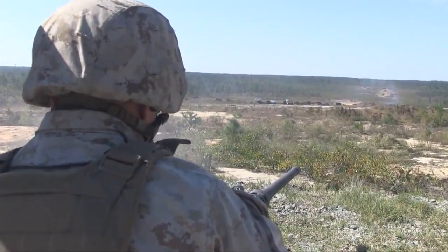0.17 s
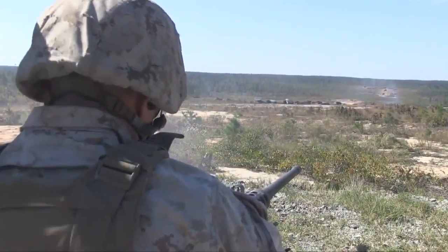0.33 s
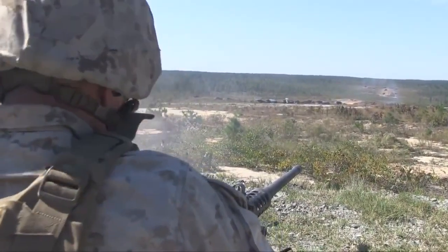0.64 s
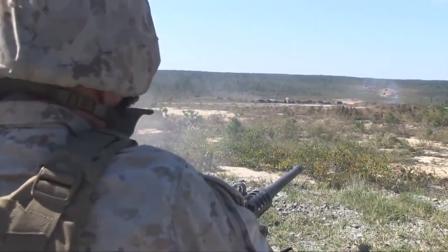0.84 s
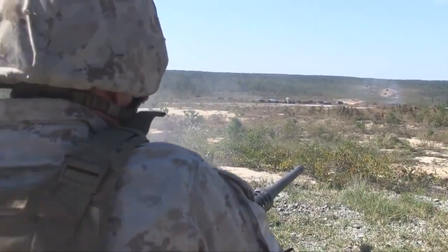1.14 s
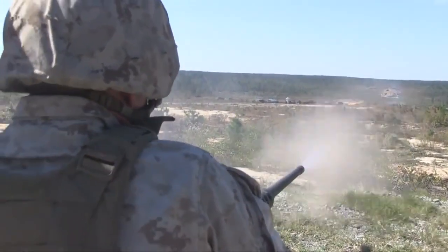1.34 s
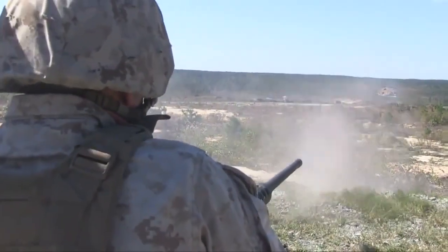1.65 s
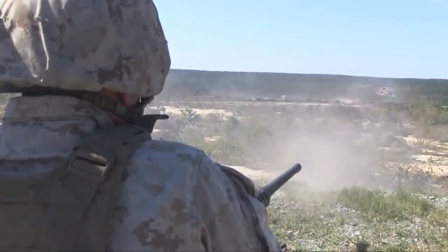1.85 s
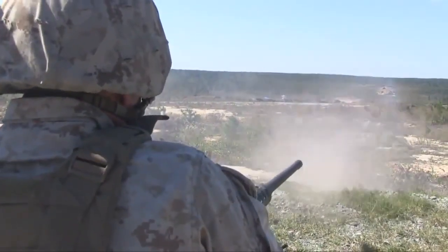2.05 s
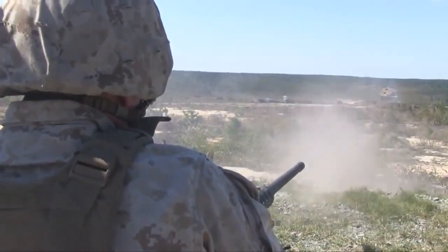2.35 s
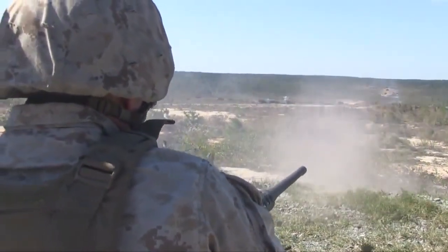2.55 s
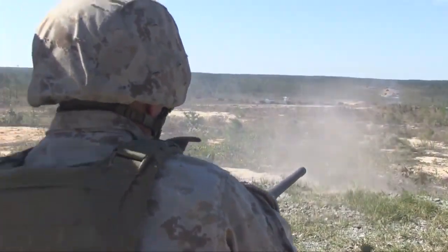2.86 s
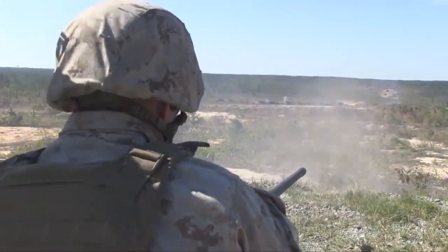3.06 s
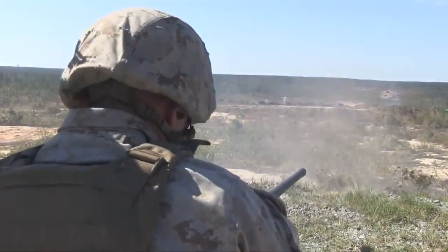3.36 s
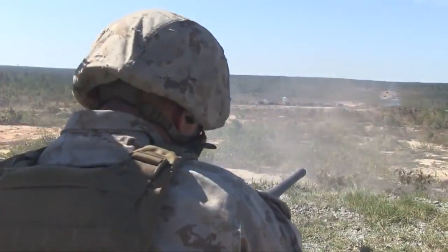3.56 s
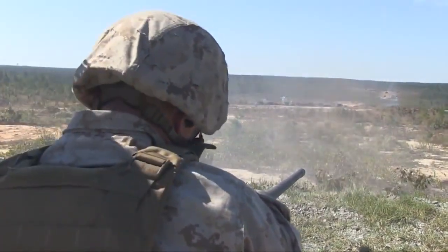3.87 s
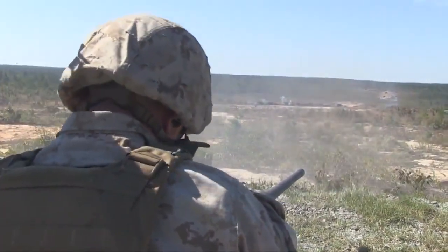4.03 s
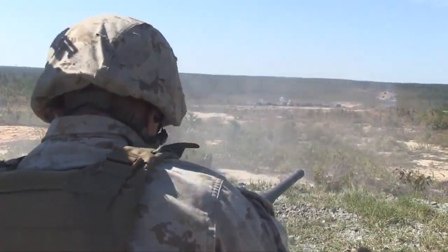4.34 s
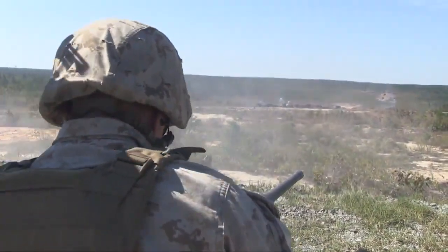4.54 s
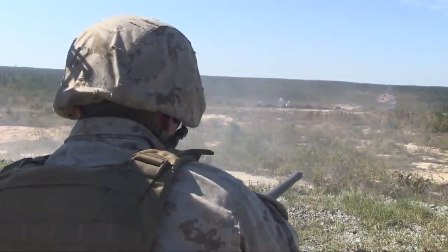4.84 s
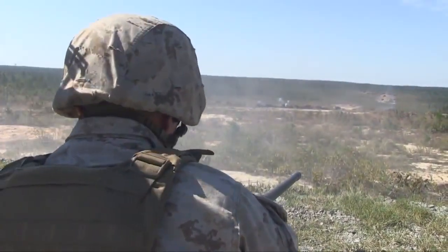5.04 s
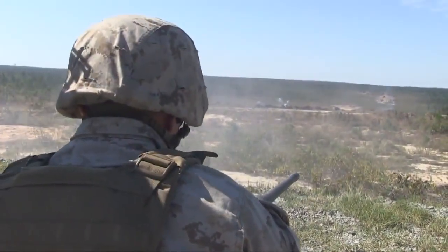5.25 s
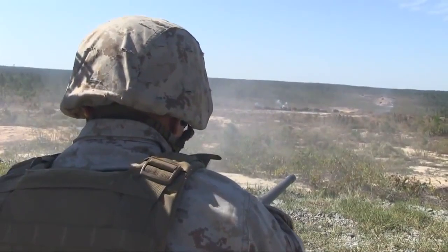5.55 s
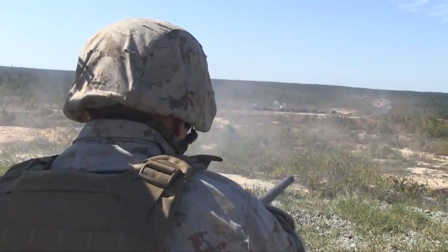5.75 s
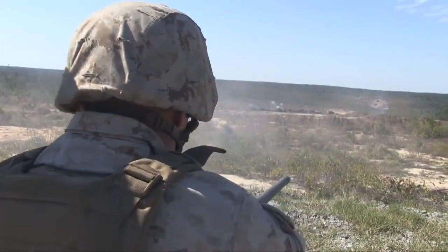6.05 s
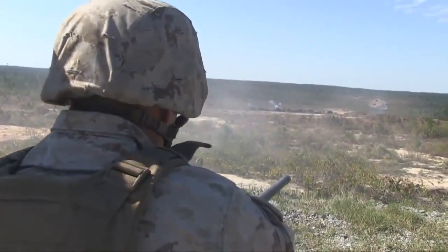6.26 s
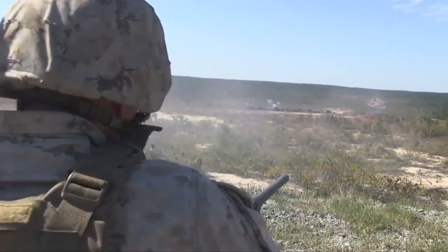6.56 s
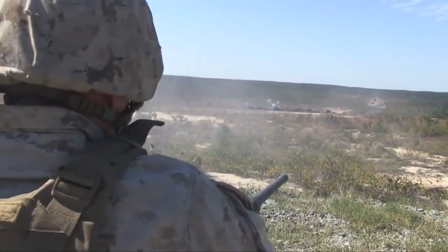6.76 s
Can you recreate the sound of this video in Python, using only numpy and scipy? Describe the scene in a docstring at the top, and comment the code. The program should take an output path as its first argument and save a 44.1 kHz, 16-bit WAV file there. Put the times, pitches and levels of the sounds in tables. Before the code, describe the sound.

Six machine guns fire in turn across a valley, recorded outdoors in stereo right beside one of them. The near gun blasts with gassy, flattened harshness while a sharper one chatters over it; spent cases tinkle faintly. Distant rapid and slower guns overlap, a neighbour thumps heavily, then after roaring echoes and small cracks another quick burst ends it.

```python
"""An open range in a valley: six machine guns fire bursts, one close by, a neighbour, four further down the line.
Every shot of a gun repeats one blast front, ground bounce and set of echoes, under fresh noise of turbulent gas.
Spent cases ring faintly; faint cracks and pops sound, most between bursts, one a bolt clack just before a
burst's last shot; shaped noise is the valley's roar.
The blasts overload the microphone and flatten; a bass cut then tilts the flat tops."""
import sys
import numpy as np
from scipy.fft import rfft, irfft, next_fast_len
from scipy.io import wavfile
from scipy.ndimage import uniform_filter1d, map_coordinates

SR = 44100
rng = np.random.default_rng(int(sys.argv[2]) if len(sys.argv) > 2 else 0)


def unload_wav(signal):
    """Save mono or channel-first audio to the path in sys.argv[1] as 16-bit WAV at rate SR, clipped to [-1, 1]."""
    wavfile.write(
        sys.argv[1],
        SR,
        np.round(np.clip(np.atleast_2d(signal).T, -1, 1) * 32767).astype(np.int16),
    )


N = 304290  # samples in the scene
SHOT = SR // 5  # samples that a shot lasts
BESIDE, NEIGHBOUR, FAR, SLOW, QUICK, BRIGHT = 0, 1, 2, 3, 4, 5  # guns, the row order of every table by gun

# Firing times: start_s, gun, level_db
SHOTS = [(0.0431, FAR, -3), (1.326, BESIDE, -3), (1.4497, BESIDE, 1.5), (1.5912, BESIDE, 1),
         (1.7137, BESIDE, 2.5), (1.7551, BRIGHT, -1.5), (1.8366, BESIDE, 0.5), (1.841, BRIGHT, 4),
         (1.9311, BRIGHT, 3.5), (1.9841, BESIDE, 2), (2.0215, BRIGHT, 2), (2.104, BESIDE, -0.5),
         (2.1099, BRIGHT, 9.5), (2.1991, BRIGHT, 6), (2.2426, BESIDE, 0.5), (2.2862, BRIGHT, 5),
         (2.3715, BESIDE, -0.5), (2.377, BRIGHT, 5), (2.4623, BRIGHT, 8), (2.5006, BESIDE, 0),
         (2.5524, BRIGHT, 1), (2.6376, BRIGHT, 5), (2.8157, FAR, -15), (3.0129, FAR, -0.5),
         (3.1085, FAR, 1), (3.2046, FAR, 0), (3.2238, SLOW, 0), (3.2984, FAR, 0), (3.3708, SLOW, 0),
         (3.3925, FAR, 0), (3.4882, FAR, 0), (3.5474, SLOW, 0), (3.5806, FAR, 0), (3.676, FAR, 0),
         (3.7677, FAR, 0), (3.8609, FAR, 0), (4.0132, NEIGHBOUR, -1.5), (4.1269, NEIGHBOUR, 0),
         (4.2408, NEIGHBOUR, -0.5), (4.3537, NEIGHBOUR, -1.5), (4.4833, NEIGHBOUR, -0.5),
         (4.5961, NEIGHBOUR, -1), (4.7207, NEIGHBOUR, 0), (6.3772, QUICK, 0.5), (6.4648, QUICK, 0),
         (6.552, QUICK, -0.5), (6.638, QUICK, 0.5), (6.7259, QUICK, 1), (6.814, QUICK, 1)]
OPENING_S, OPENING_DB = 1.3279, 20  # the gun beside opens its burst with a stronger front


def guns():
    """Superposition: each shot adds fresh turbulence to the blast that its gun repeats."""
    out = np.zeros((2, N + SHOT))
    blasts = [blast(gun) for gun in range(len(FRONTS))]
    for start_s, gun, level_db in SHOTS:
        direct, reflected = blasts[gun]
        body, hiss = gas(gun)
        first = round(start_s * SR)
        out[:, first:first + SHOT] += amp(level_db) * (direct + reflected + 0.54 * body + hiss)
    first = round(OPENING_S * SR)
    opening_front, _ = blasts[BESIDE]
    out[:, first:first + SHOT] += amp(OPENING_DB) * opening_front
    return out[:, :N]


# Blast front by gun: rise_ms, swing_ms, decay_ms, bounce_delay_ms, bounce_swing_ms, left_lead_ms
FRONTS = [(.2, .55, 3, 1.6, .55, -.03), (.15, .6, 5, 2.4, .6, .07), (.6, 1.05, 2.8, 2.5, 1.55, .11),
          (1, 1.35, 4.2, 3.6, 1.75, .11), (.45, 1.05, 2.6, 2.55, 1.4, .11), (.2, .9, 3, 2.2, 1.4, .02)]
# Strength by gun: front_db, bounce_db, echoes_db, push_db
STRENGTHS = [(-15.5, -21.5, 5.5, -3.5), (8.5, -9, 1, -13), (12, 8, 2, -28), (11.5, 8.5, .5, -28),
             (12, 11.5, 4.5, -19), (6, 8, -0.5, -28)]
# Loudest echoes off mounds and banks, one list a gun: delay_ms (before 1.2 ms more), level_db (before echoes_db)
ECHOES = [
    [(25.0, -8.5), (32.8, 8), (35.5, -2), (40.1, -9), (57.5, -4.5), (75.6, -10), (82.0, -10)],
    [(8.7, 7.5), (13.7, -2), (18.7, 0.5), (22.6, -2.5), (26.7, -6), (49.6, -4), (61.9, -7), (66.4, -8),
     (71.5, -12), (84.6, -10)],
    [(7.8, -7), (12.0, -10), (16.2, -14), (19.0, -16), (36.2, -14.5), (41.1, -17.5), (79.3, -17.5)],
    [(9.8, -5.5), (17.3, -16), (20.2, -16)],
    [(11.7, -11.5), (18.8, -15.5), (22.9, -17), (29.5, -15), (33.3, -13.5), (36.2, -16.5), (61.6, -21),
     (66.9, -21), (72.1, -14)],
    [(9, -6), (13, -16.5), (30, -9), (35, -12), (73, -12)],
]
# Echo width by gun: width_ms
ECHO_WIDTHS = [0.65, 0.8, 0.64, .66, 0.59, 0.58]


def blast(gun):
    """Shock and reflection: a steep front and slower ground bounce; then echoes, a low push and scatter."""
    rise_ms, swing_ms, decay_ms, bounce_ms, bounce_swing_ms, lead_ms = FRONTS[gun]
    front_db, bounce_db, echoes_db, push_db = STRENGTHS[gun]
    ms = np.arange(SHOT) / SR * 1000 + np.array([[lead_ms], [0]])

    def front(t_ms, quarter_ms):
        """Damped oscillation: a smooth rise, then a cosine that decays."""
        late = np.maximum(t_ms, 0)
        rise = np.sin(np.pi / 2 * np.clip(t_ms / rise_ms, 0, 1)) ** 2
        return -rise * np.cos(np.pi / 2 * late / quarter_ms) * np.exp(-late / decay_ms)

    bounce = amp(bounce_db) * front(ms - bounce_ms, bounce_swing_ms)
    direct = amp(front_db) * front(ms, swing_ms) + bounce
    echoes = sum(amp(level_db + echoes_db) * bump(ms - delay_ms - 1.2, ECHO_WIDTHS[gun])
                 for delay_ms, level_db in ECHOES[gun])
    push = amp(push_db) * bump(ms - 24, 1.8)  # the ground shakes
    scatter, _ = gas(gun)  # drawn once: fixed obstacles scatter alike each time
    return direct, echoes + strewn(ms, gun) + push + .7 * scatter


# Weaker echoes by gun: level_db (where they start)
STREWN_LEVELS = [-12, -6.5, -22, -33, -25, -18]
STREWN_MS, STREWN_FADE_DB, STREWN_SPREAD_DB = (20, 110), 7.5, 4  # span, fade across it, random spread
STREWN_WIDTH_MS, STREWN_PAN_DB = 0.5, 2.5  # sharper than the loudest echoes, from either side


def strewn(ms, gun, count=18):
    """Diffuse reflection: weak echoes at random delays, the same for every shot of a gun."""
    place = (np.arange(count) + rng.random(count)) / count
    size, pan, width = rng.standard_normal((3, count))
    first_ms, last_ms = STREWN_MS
    delays_ms = first_ms + (last_ms - first_ms) * place
    levels_db = STREWN_LEVELS[gun] - STREWN_FADE_DB * place + STREWN_SPREAD_DB * size
    widths_ms = STREWN_WIDTH_MS * np.exp(0.18 * width)
    out = np.zeros((2, SHOT))
    for delay_ms, level_db, side, width_ms in zip(delays_ms, levels_db, pan, widths_ms):
        sides_db = STREWN_PAN_DB * side * np.array([[.5], [-.5]])
        out += amp(level_db + sides_db) * bump(ms - delay_ms, width_ms)
    return out


def bump(ms, width_ms):
    """Dispersal: a blast rounded off by distance, one hump between two dips."""
    return (1 - (ms / width_ms) ** 2) * np.exp(-.5 * (ms / width_ms) ** 2)


# Gas spectra, relative: pitch_hz, density_db (per Hz); the hiss for the gun beside, one pit away, further off
BODY_SPECTRUM = [(100, -12.5), (200, 5.5), (400, 0), (900, 1), (1500, -8), (3000, -17.5), (5000, -34.5)]
HISS_SPECTRA = [
    [(700, -30), (1500, -3), (3000, 0), (6000, -3), (10000, -5), (14000, -11), (17000, -22)],
    [(700, -25), (1500, -1), (3000, 0), (6000, -5), (10000, -10), (14000, -20), (17000, -32)],
    [(700, -25), (1500, -3), (3000, 0), (6000, -5), (10000, -15), (14000, -27), (17000, -40)],
]
# Gas envelopes by gun: start_ms, peak_db, lasts_ms, droop_db, fall_db_per_ms, puff_ms, puff_db, tail_db,
# loss_db (per 100 ms)
BODY_GUSTS = [(5, 7.5, 19.2, 4.9, 1.08, 44, -15, -8.5, 12.9),
              (0, 13.5, 10, 5.3, 2.1, 34, -5.5, -10.5, 13.7), (0.5, -14.5, 6.6, 3, 1.3, 40, -40, -28, 11.3),
              (-1, -15.5, 8.3, 3.4, 0.65, 40, -40, -40, 11), (5, -5, 2.2, 3.4, 3.9, 35, -29, -19, 24),
              (0, -3.5, 4.2, 3.8, 1.4, 36, -32, -21, 16.4)]
HISS_GUSTS = [(5, 14.5, 12.3, 9.4, 4.2, 31.7, -11, -19.5, 12.5),
              (0.5, 2.8, 9.4, 10.6, 2.5, 37, -22, -20, 9.5),
              (-10.5, -19.5, 8.9, 4.4, 1.6, 40, -55, -38.5, 6), (2, -30, 8.8, 4, 0.92, 40, -55, -52, 10),
              (3.5, -13, 2.64, 4, 6, 38, -43, -33, 15), (-1.5, -5.5, 6, 15, 2.6, 50, -37.5, -37, 6.4)]


def gas(gun):
    """Turbulence: body and hiss of the gas behind one blast, as shaped noise."""
    ms, lead_ms = np.arange(SHOT) / SR * 1000, FRONTS[gun][-1]
    body = sideways(noise(BODY_SPECTRUM, count=SHOT), lead_ms)
    hiss = sideways(noise(HISS_SPECTRA[min(gun, FAR)], count=SHOT), lead_ms)  # distance dulls it
    return gust(ms, *BODY_GUSTS[gun]) * body, gust(ms, *HISS_GUSTS[gun]) * hiss


PUFF_RISE_DB_MS, PUFF_FALL_DB_MS = 0.5, 1.5


def gust(ms, start_ms, peak_db, lasts_ms, droop_db, fall_db, puff_ms, puff_db, tail_db, loss_db):
    """Addition of power: flash, puff and tail make one envelope."""
    since = ms - start_ms
    droop = droop_db * np.clip(since / lasts_ms, 0, 1)
    fall = fall_db * np.maximum(since - lasts_ms, 0)
    flash = np.clip(since / 0.41, 0, 1) * amp(peak_db - droop - fall)
    away_db = np.maximum(PUFF_RISE_DB_MS * (puff_ms - ms), PUFF_FALL_DB_MS * (ms - puff_ms))
    puff = amp(puff_db - away_db)
    tail = np.minimum(ms / .6, 1) * amp(tail_db - loss_db * ms / 100)
    return np.sqrt(flash ** 2 + puff ** 2 + tail ** 2)


# Spent cases landing: start_s, level_db
CASES = [(1.42, -32.5), (1.57, -32), (1.90, -33), (2.03, -32), (2.29, -36), (2.44, -36), (2.655, -41),
         (2.70, -36)]
# Brass modes: pitch_hz, level_db, t60_s
BRASS_MODES = [(6200, -0.5, 0.32), (3400, -3.5, 0.23)]


def cases():
    """Modal resonance: each spent case rings faintly and thinly in decaying sines."""
    out, t = np.zeros(N), np.arange(SR // 4) / SR
    for start_s, case_db in CASES:
        ring = np.zeros(len(t))
        for hz, mode_db, t60_s in BRASS_MODES:
            decay = amp(case_db + mode_db + rng.normal(0, 2) - 60 * t / t60_s)
            ring += decay * np.sin(2 * np.pi * hz * rng.normal(1, 0.0016) * t)
        out[round(start_s * SR):][:len(t)] += np.minimum(t / .003, 1) * ring
    return out


# Faint cracks and pops, most between bursts, one a bolt clack just before a burst's last shot:
# start_s, crack_db (before a 10 dB cut), pop_db (before a 5.5 dB lift)
CRACKS = [(0.4544, -14.5, -19.5), (0.704, -14, -28), (0.8583, -21, -18), (1.043, -24, -25),
          (1.138, -22.5, -26), (1.2167, -10.5, -9.5), (1.3, -18, -31), (2.631, -7, -11),
          (2.7708, -13.5, -36), (2.8949, -12, -37), (4.9018, -17.5, -17), (5.025, -11.5, -13),
          (5.1237, -31.5, -23), (5.316, -25, -30), (5.4394, -38, -34)]
# Spectrum of the spit, relative: pitch_hz, density_db (per Hz)
SPIT_SPECTRUM = [(900, -25), (2000, -2), (3200, 0), (6000, -12), (9000, -26), (12000, -50)]


def cracks():
    """Impulsive noise: a short dull spit decaying over one low pop."""
    out, ms = np.zeros((2, N)), np.arange(SR // 20) / SR * 1000
    onset = np.minimum(ms, 1)
    for start_s, crack_db, pop_db in CRACKS:
        spit = amp(crack_db - 10 - 60 * ms / 45) * onset * noise(SPIT_SPECTRUM, count=len(ms))
        pop = amp(pop_db + 5.5) * onset * bump(ms - 1.3, 0.75)
        out[:, round(start_s * SR):][:, :len(ms)] += spit + pop
    return out


# Roar of the valley: time_s, rumble_db, rush_db
ROAR = [(0, -23, -31.5), (.57, -22, -24.5), (.75, -23.5, -26.5), (1.31, -24, -28), (2.1, -13.5, -24.5),
        (2.55, -15.5, -24.5), (2.72, -24, -32), (2.92, -21, -26), (3.09, -23, -32.5), (3.5, -20, -36.5),
        (4.0, -22.5, -32.5), (4.75, -14.5, -36), (4.95, -23.5, -31.5), (5.3, -20, -26), (5.77, -24, -29.5),
        (6.36, -25.5, -31), (6.5, -26.5, -42), (6.9, -26.5, -39)]
# Spectra of the roar, relative: pitch_hz, density_db (per Hz)
RUMBLE_SPECTRUM = [(15, -55.5), (25, -23), (43, -33), (124, -4.5), (243, -4.5), (374, -13), (568, -18),
                   (700, -37), (910, -68.5), (1540, -120)]
RUSH_SPECTRUM = [(260, -42.5), (450, -3), (815, 0), (1260, -2.5), (2170, -7.5), (3390, -14), (4000, -24.5),
                 (5200, -62.5), (8800, -120)]
TREBLE_SPECTRUM = [(2200, -25.5), (3000, -2.5), (4500, -6), (6500, -14), (8000, -24), (10000, -58)]
AIR_SPECTRUM = [(4500, -34), (6500, -7.5), (9000, -12), (12000, -18.5), (14000, -27.5), (15500, -47)]
# Just after a shot, by gun: treble_db (over the rush); air_db
TREBLE_FED = [-3, -5.5, -10.5, -10, -5, -11.5]
AIR_FED = [-45, -39, -56, -56, -53, -41.5]
TREBLE_FADE_DB_S, TREBLE_REST_DB = 13, -19.5  # the rest is relative to the rush
AIR_FADE_DB_S, AIR_REST_DB = 28, -76.5
EARLIER_S, EARLIER_TREBLE_DB, EARLIER_AIR_DB = -.05, -6.5, -43  # a burst has just ended


def valley():
    """Reverberation: countless far echoes as noise, its treble and air fed by shots and soon fading."""
    rumble_db, rush_db = curves(ROAR, np.arange(N) / SR)
    treble_fed = [(EARLIER_S, EARLIER_TREBLE_DB)] + [(s, TREBLE_FED[gun]) for s, gun, _ in SHOTS]
    air_fed = [(EARLIER_S, EARLIER_AIR_DB)] + [(s, AIR_FED[gun]) for s, gun, _ in SHOTS]
    treble_db = rush_db + fading(treble_fed, TREBLE_FADE_DB_S, TREBLE_REST_DB)
    air_db = fading(air_fed, AIR_FADE_DB_S, AIR_REST_DB)
    lumps = wobble(45)  # one unevenness shared by all the layers
    rumble = amp(rumble_db) * unit(amp(2.0 * lumps) * noise(RUMBLE_SPECTRUM, count=N))
    rush = amp(rush_db) * unit(amp(1.0 * lumps) * noise(RUSH_SPECTRUM, count=N))
    treble = amp(treble_db) * noise(TREBLE_SPECTRUM, count=N)
    air = amp(air_db) * noise(AIR_SPECTRUM, count=N)
    return sideways(rumble + rush + amp(1.2 * lumps) * (treble + air), -.07)  # from the right


def fading(fed, fade_db_s, rest_db):
    """Exponential decay: each (start_s, level_db) tops a level up, which sinks steadily to its rest."""
    t = np.arange(N) / SR
    level_db = np.full(N, float(rest_db))
    for start_s, fed_db in fed:
        sinking_db = fed_db - fade_db_s * (t - start_s)
        level_db = np.where(t >= start_s, np.maximum(level_db, sinking_db), level_db)
    return uniform_filter1d(level_db, SR // 20)


def wobble(rate):
    """Slow random modulation: a smooth curve with rate knots a second."""
    knots = rng.standard_normal(int(N * rate / SR) + 4)
    return map_coordinates(knots, [np.arange(N) * rate / SR])


# Likeness of left and right: pitch_hz, correlation (0 to 1)
LIKENESS = [(60, .9), (180, .94), (550, .86), (1650, .62), (5000, .38), (15000, .42)]


def noise(spectrum, count):
    """Interaural coherence: stereo noise of rms 1, more alike in the bass than in the treble."""
    def mid_side(hz):
        turn = np.arccos(np.clip(along(LIKENESS, hz), 0, 1)) / 2
        return amp(along(spectrum, hz)) * [np.cos(turn), np.sin(turn)]

    mid, side = filtered(rng.standard_normal((2, count)), mid_side)
    return unit(np.array([mid + side, mid - side]))


def sideways(pair, lead_ms):
    """Interaural delay: the left channel leads, or lags if lead_ms is negative."""
    return np.array([np.roll(pair[0], -round(lead_ms * SR / 1000)), pair[1]])


def amp(db):
    """Decibel law: dB to gain."""
    return 10 ** (np.asarray(db) / 20)


def unit(x):
    """Normalisation of power: scaled to rms 1."""
    return x / np.sqrt(np.mean(x ** 2) + 1e-20)


def along(points, hz):
    """Logarithmic pitch: (pitch_hz, value) points read on a log axis."""
    f, v = np.transpose(points)
    return np.interp(np.log(hz + 1), np.log(f + 1), v)


def curves(rows, t):
    """Linear interpolation: each column after the first, read at times t."""
    s, *columns = np.transpose(rows)
    return [np.interp(t, s, column) for column in columns]


def filtered(x, response):
    """Linear filtering: x times a response of frequency, in the spectrum."""
    n = x.shape[-1]
    m = next_fast_len(n + 2048)
    return irfft(rfft(x, m) * response(np.fft.rfftfreq(m, 1 / SR)), m)[..., :n]


def scene():
    """Superposition: guns, cases and cracks over the valley's roar."""
    return guns() + cases() + cracks() + valley()


# Dips in level after bursts start: start_s, dip_db, return_s (duration), stay_db, end_s
DIPS = [(1.38, -8.5, .42, -2.2, 2.6), (3.24, -2.6, .12, -1.4, 3.7), (4.05, -3.5, .17, -1.6, 4.75),
        (6.4, -5, .3, -1.6, 6.9)]
OPEN_DB, FALL_S, RELEASE_S = 1, .05, .3


def level():
    """Gain envelope: open between the dips; in each it falls, creeps partly back, stays low, then opens."""
    t = np.arange(N) / SR
    gain_db = np.full(N, float(OPEN_DB))
    for start_s, dip_db, return_s, stay_db, end_s in DIPS:
        low_s = start_s + FALL_S
        back_s = low_s + return_s
        held_s = max(end_s, back_s)
        times = [start_s, low_s, back_s, held_s, held_s + RELEASE_S]
        gain_db += np.interp(t, times, [0, dip_db, stay_db, stay_db, 0])
    return amp(gain_db)


def record(dry):
    """Saturation: overloaded capsules, bass cut, softer top, changing level, ceiling and band limit."""
    capsule = dry / (1 + np.abs(dry / 0.91) ** 4.33) ** (1 / 3.32)
    # the bass cut at 45 Hz tilts the flat tops
    thin = filtered(capsule, lambda hz: 1j * hz / (45 + 1j * hz) / (1 + 1j * hz / 22000))
    gain = level() * amp([[.3], [-.4]])  # left, right
    ceiling = np.clip(thin * gain, -1, 1)
    # the band closes from 14700 to 15600 Hz
    return filtered(ceiling, lambda hz: np.clip((15600 - hz) / 900, 0, 1) ** 2)


dry = scene()
out = record(dry)
unload_wav(out)
```